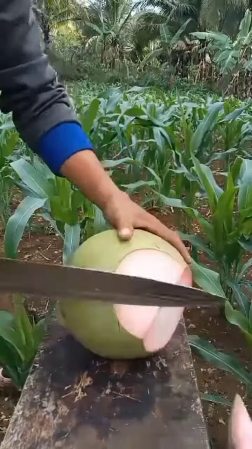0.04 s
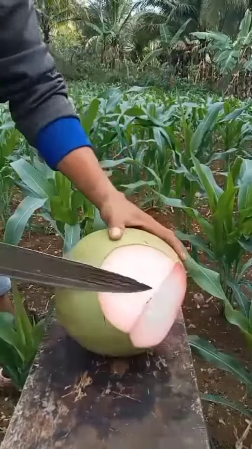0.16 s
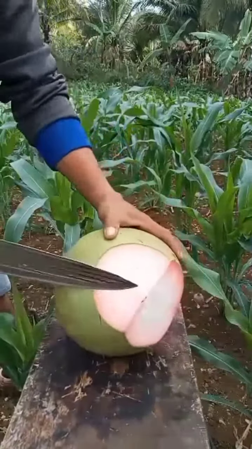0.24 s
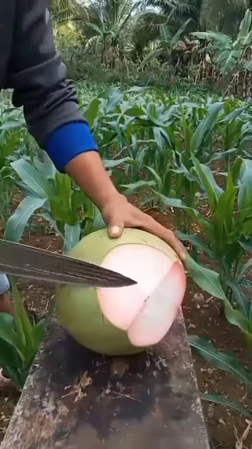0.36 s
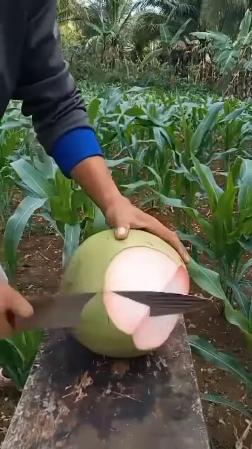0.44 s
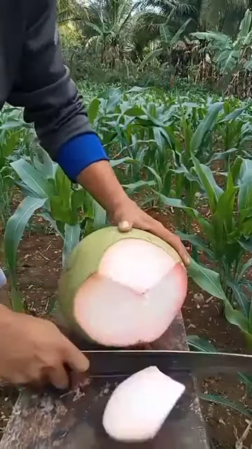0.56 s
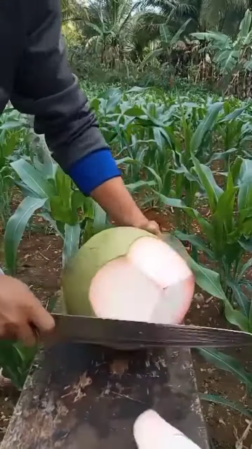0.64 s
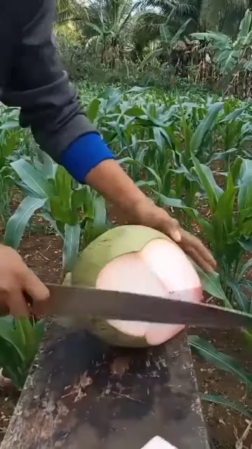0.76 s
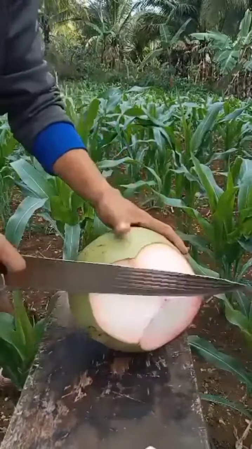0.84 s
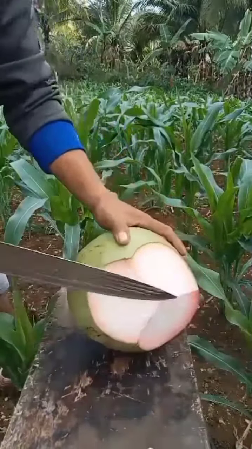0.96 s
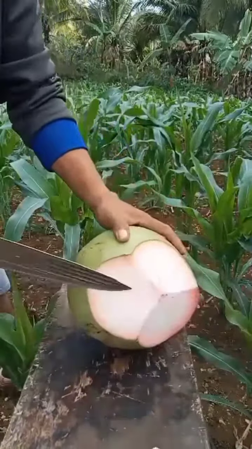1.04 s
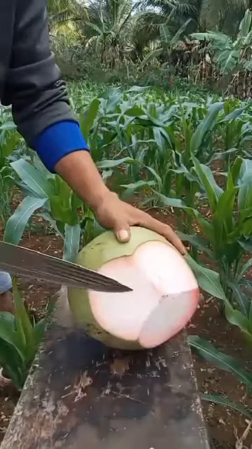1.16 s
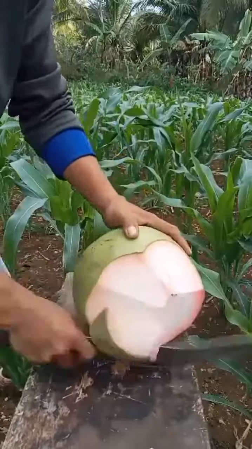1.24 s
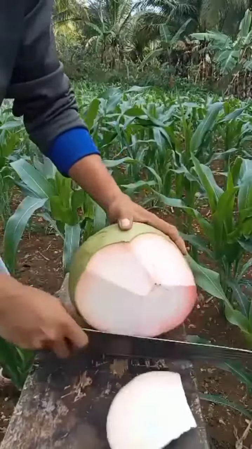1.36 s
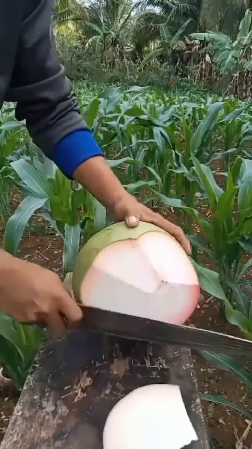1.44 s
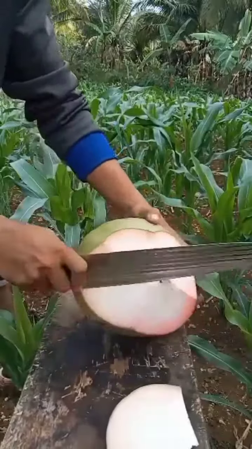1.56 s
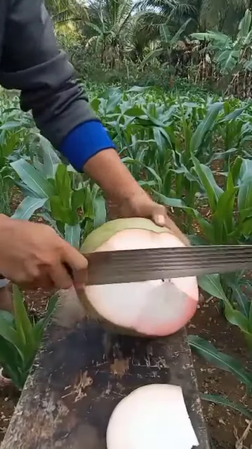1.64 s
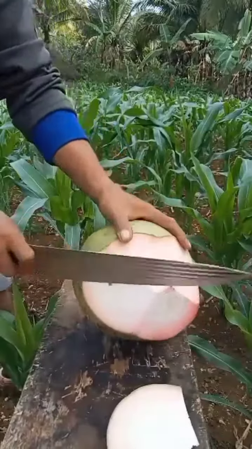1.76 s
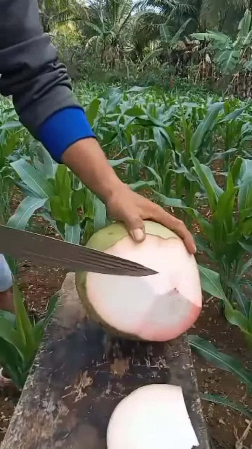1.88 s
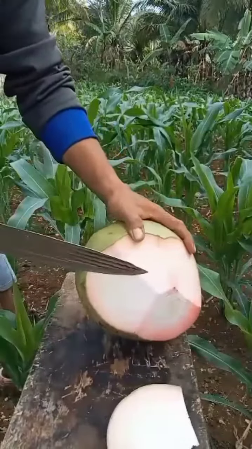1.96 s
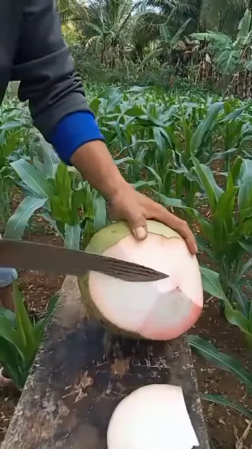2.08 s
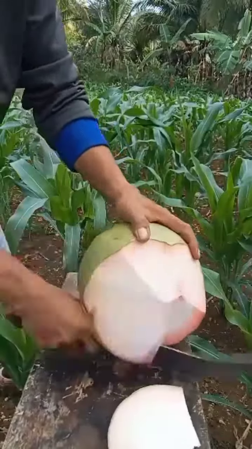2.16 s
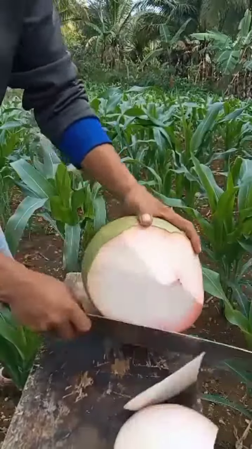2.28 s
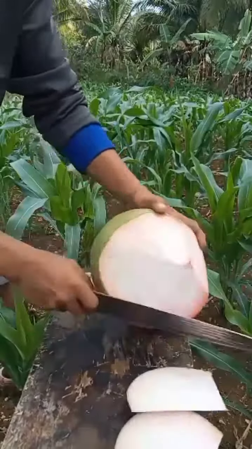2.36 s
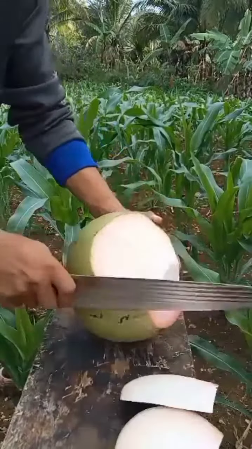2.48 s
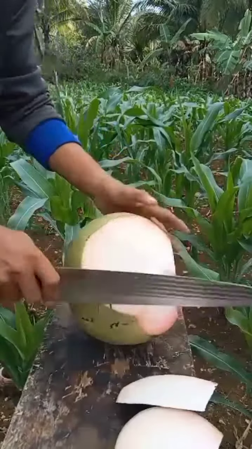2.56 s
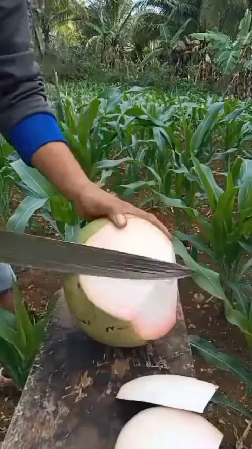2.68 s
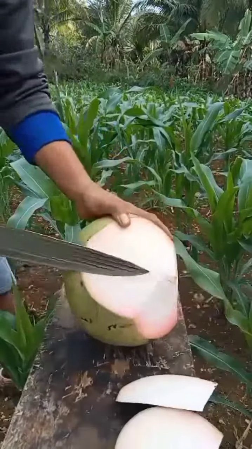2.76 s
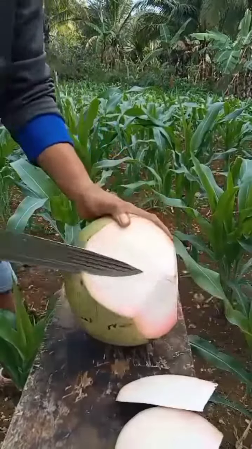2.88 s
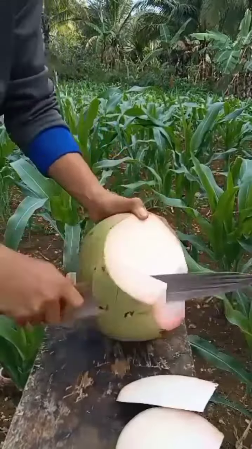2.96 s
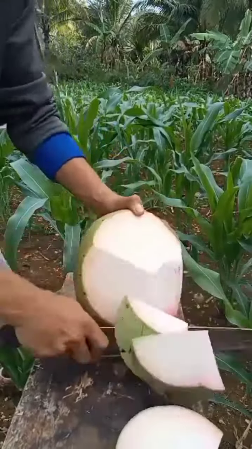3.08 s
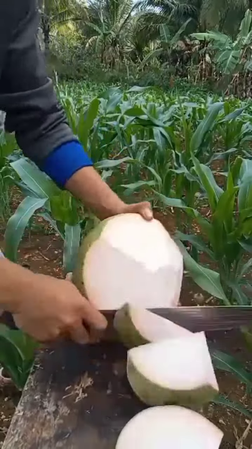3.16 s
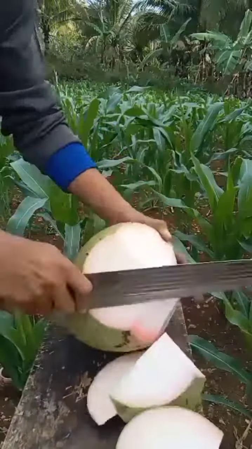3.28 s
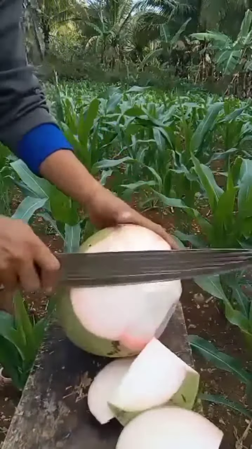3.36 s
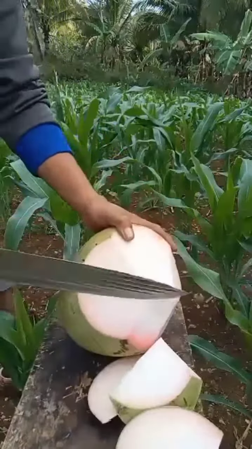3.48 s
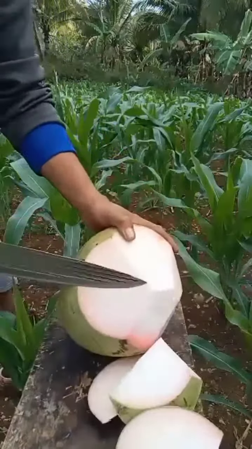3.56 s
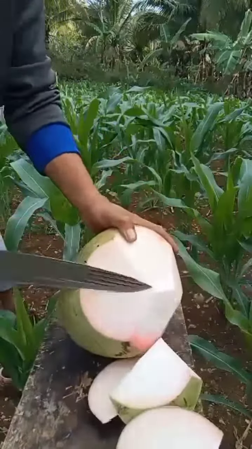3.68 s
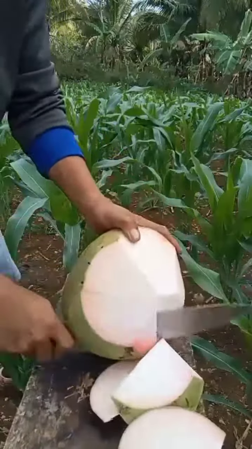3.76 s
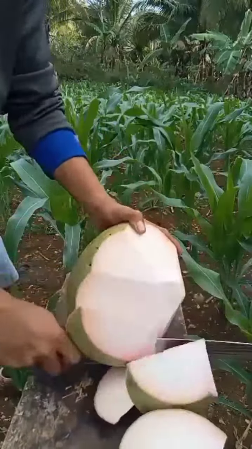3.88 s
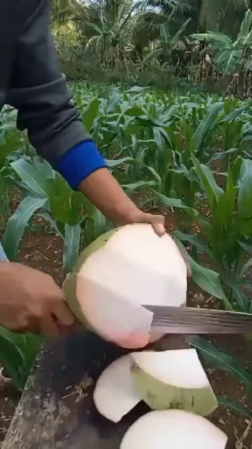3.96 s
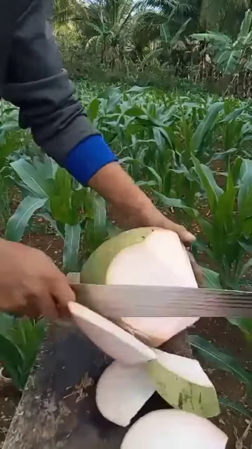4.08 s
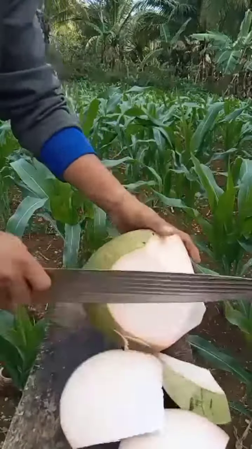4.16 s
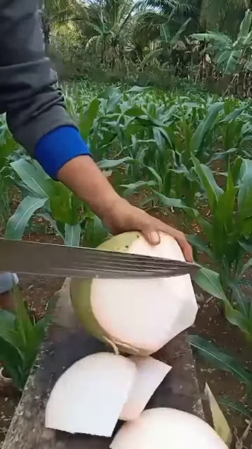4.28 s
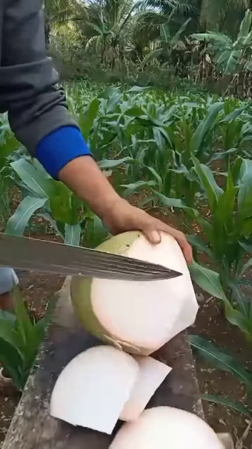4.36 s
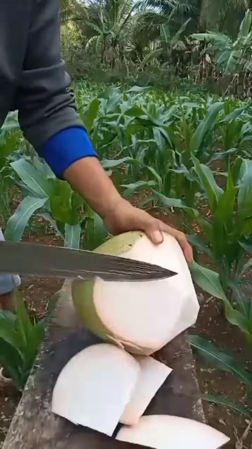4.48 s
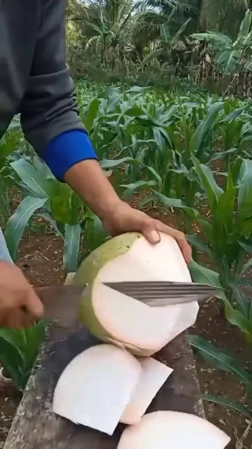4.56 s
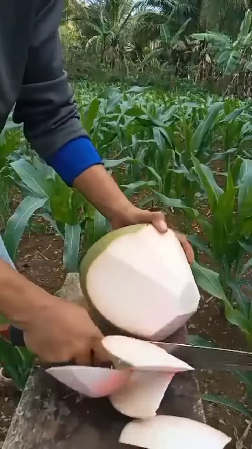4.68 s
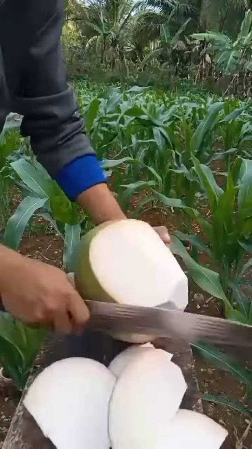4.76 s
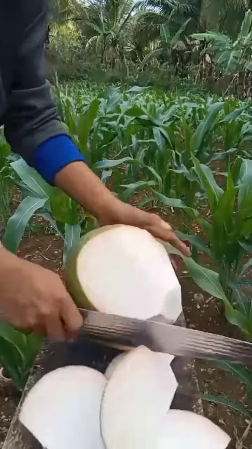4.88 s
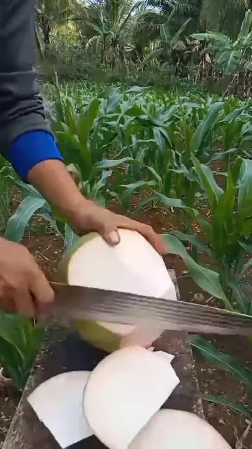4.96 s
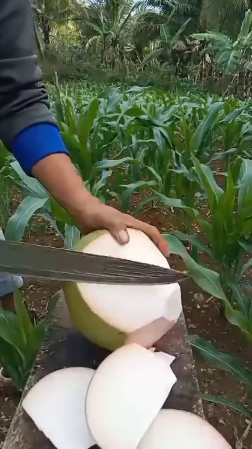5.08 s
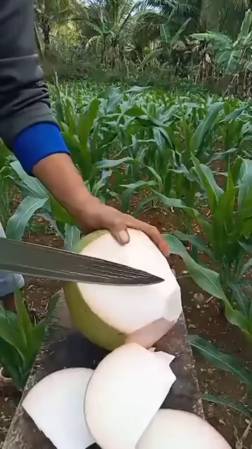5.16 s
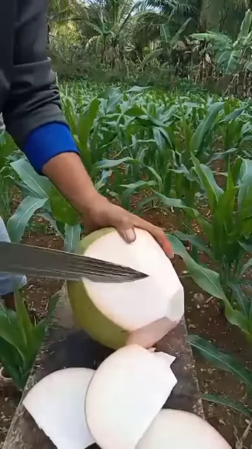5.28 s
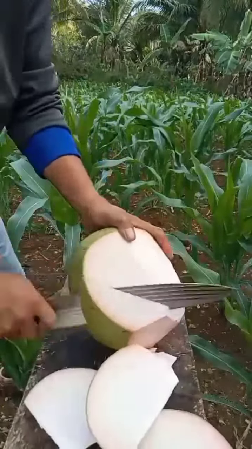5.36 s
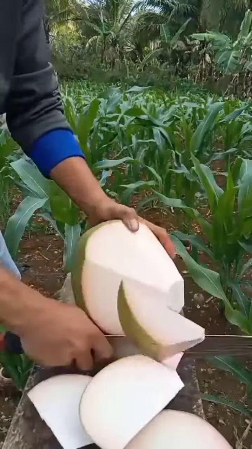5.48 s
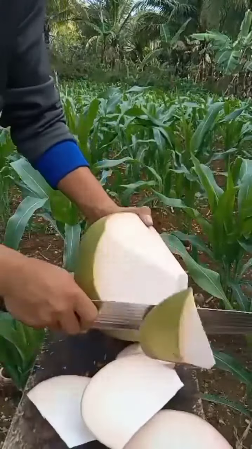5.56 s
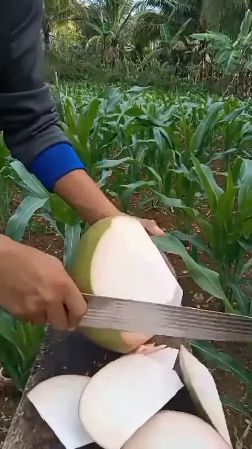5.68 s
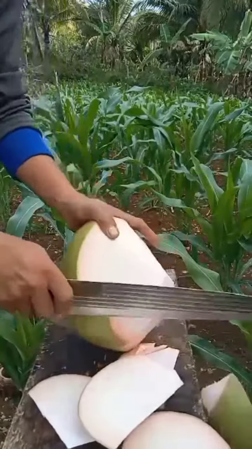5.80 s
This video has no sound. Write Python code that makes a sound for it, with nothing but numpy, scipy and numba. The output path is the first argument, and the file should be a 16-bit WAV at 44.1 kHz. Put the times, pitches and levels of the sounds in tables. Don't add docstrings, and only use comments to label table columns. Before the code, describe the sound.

Seven quick blade strokes rip through wet coconut husk, each rising rasp ending in a hard hollow knock on a wooden board outdoors.

```python
import sys
import numpy as np
from scipy import signal
from scipy.fft import rfft, irfft
from scipy.io import wavfile
from numba import njit

SR = 44100
rng = np.random.default_rng(int(sys.argv[2]) if len(sys.argv) > 2 else 0)


def field_ratio(decibels):
    return 10 ** (np.asarray(decibels, dtype=float) / 20)


def transcribe(signal):
    frames = np.atleast_2d(signal).T
    limited = np.clip(frames, -1, 1)
    pcm = np.round(limited * 32767).astype(np.int16)
    wavfile.write(sys.argv[1], SR, pcm)


N = 257103

TREBLE_EDGE_HZ, TOP_HZ = 5250, 16000
GONE_DB = -64.5

# hz, level_db (per Hz)
RASP_SPECTRUM = [(150, -61), (250, -21.5), (623, -2.5), (854, -4.5), (1230, -2.5), (1450, -7), (2200, -7),
                 (3870, -1.5), (7510, -27.5), (9960, -18.5), (13200, -30.5)]
# time_s, tearing_db, crunch_db (re tearing),
# sizzle_db (re tearing), slit_pitch_hz
FIRST_STROKES = [
    [(0.438, -53, -18, -15, 819), (0.472, -38.5, -1, -3, 870), (0.494, -38, -1, -10.5, 1010),
     (0.526, -28, -3, -3, 1050), (0.554, -23.5, -6.5, -6, 680), (0.57, -28.5, -1, -1, 673),
     (0.584, -35, 15.5, -7, 671), (0.595, -54, 10, -38.5, 670)],
    [(1.219, -55.5, 2, -8, 830), (1.245, -44.5, 1.5, -4, 1083), (1.269, -33, 0.5, -8, 1148),
     (1.305, -29.5, -10.5, -1, 1125), (1.337, -27, -3.5, -4.5, 714), (1.349, -25.5, 3.5, -1.5, 693),
     (1.371, -30.5, 3.5, -20, 665), (1.378, -38.5, 11.5, -25.5, 665)],
    [(2.105, -58, -6, -6.5, 933), (2.143, -38, -2.5, -3.5, 1013), (2.175, -33, 1, -6, 1153),
     (2.207, -28, -9, -5, 1180), (2.233, -28, -7, -6, 692), (2.245, -19, -12.5, -8.5, 653),
     (2.275, -30, 13.5, -5, 651), (2.288, -46.5, 15, -36, 661)],
    [(3.003, -61, -16, -1, 1018), (3.025, -32.5, -5.5, -4.5, 958), (3.045, -29.5, -19.5, -4, 638),
     (3.071, -26, 2.5, -0.5, 565), (3.077, -39, 9.5, 1.5, 580), (3.085, -37, 15, -8.5, 565.5),
     (3.098, -42.5, 11.5, -9, 564)],
]
LAST_STROKES = [
    [(3.733, -62.5, 0, -14.5, 1170), (3.755, -37.5, -1, -8, 1130), (3.829, -24.5, -4, -7, 1220),
     (3.851, -21.5, -1, -2.5, 1100), (3.871, -28.5, 4.5, -11, 858), (3.882, -38, -18, -11, 795)],
    [(4.54, -59, 2, -14, 859), (4.546, -44.5, -4, -14, 935), (4.576, -33.5, 0, -8, 1060),
     (4.612, -28.5, -7.5, -7.5, 1150), (4.628, -24.5, -11, -6, 1160), (4.652, -20.5, -10, -8.5, 674),
     (4.678, -25, -3, -2.5, 591), (4.698, -45, 0, 0, 577)],
    [(5.317, -49.5, -7.5, -7, 1090), (5.375, -32.5, -4, -8.5, 1040), (5.435, -28, -14.5, -1, 1120),
     (5.447, -26.5, -4, -10, 1110), (5.469, -29, -17, -3.5, 565), (5.481, -30.5, -1.5, -5, 543),
     (5.495, -20.5, -6.5, -5, 536), (5.508, -53, -6, 5, 536)],
]
STROKES = FIRST_STROKES + LAST_STROKES
# enter_s, full_tear_s, rasp_db, sizzle_db (re rasp)
NICK_ROWS = [
    (0.656, 0.684, -34, -5),
    (2.927, 2.971, -36.5, -8.5),
    (3.856, 3.921, -43, -8.5),
    (4.445, 4.473, -52, 4),
    (4.514, 4.528, -45, -6),
]


def rms_one(x):
    return x / np.sqrt(np.mean(x ** 2) + 1e-20)


def peak_one(x):
    return x / abs(x).max()


def in_time(rows, silent=None):
    s, *columns = np.transpose(rows)
    return np.array([np.interp(np.arange(N) / SR, s, c, silent, silent) for c in columns])


def colour(x, spectrum):
    hz, level_db = np.transpose(spectrum)
    grid_hz = np.maximum(np.fft.rfftfreq(8192, 1 / SR), 5)
    cepstrum = irfft(np.interp(np.log(grid_hz), np.log(hz), level_db) * np.log(10) / 20)
    cepstrum[1:4096] *= 2
    cepstrum[4097:] = 0
    return signal.fftconvolve(x, irfft(np.exp(rfft(cepstrum))))[:len(x)]


def split(x, low_hz, high_hz):
    return signal.sosfilt(signal.butter(3, [low_hz, high_hz], "band", fs=SR, output="sos"), x)


def elliptic(x, edge_hz, kind):
    return signal.sosfilt(signal.ellip(10, 0.5, 70, edge_hz, kind, fs=SR, output="sos"), x)


def drift(rate_hz):
    r = np.exp(-32 * np.pi * rate_hz / SR)
    slow = signal.lfilter([1], [1, -2 * r, r * r], rng.standard_normal(N // 16 + 3002))[3000:]
    return np.interp(np.arange(N) / 16, np.arange(len(slow)), rms_one(slow))


def add(out, s, sound):
    at = round(s * SR)
    out[at:at + len(sound)] += sound[:N - at]


def ringing(modes, scale_hz, strengths_db):
    t = np.arange(SR // 4) / SR
    out = np.zeros(len(t))
    for (multiple, level_db, t60_s), strength_db in zip(modes, strengths_db):
        envelope = field_ratio(level_db + strength_db - 60 * t / t60_s)
        out += envelope * np.sin(2 * np.pi * multiple * scale_hz * t)
    return out


@njit
def sweep(x, turn, r):
    y = np.zeros(len(x))
    for i in range(2, len(x)):
        drive = (1 - r * r) / 2 * (x[i] - x[i - 2])
        y[i] = drive + 2 * r * np.cos(turn[i]) * y[i - 1] - r * r * y[i - 2]
    return y


def resonate(x, hz, width_hz):
    turn = 2 * np.pi * (np.zeros(N) + hz) / SR
    return rms_one(sweep(x, turn, np.exp(-np.pi * width_hz / SR)))


def fibres(per_s, spread_db, cycles, clump_db, clumps_per_s):
    sizes = field_ratio(spread_db * np.minimum(rng.exponential(1, N), 4)) * rng.choice([-1, 1], N)
    sizes = sizes * (rng.random(N) < per_s / SR)
    dealt = rng.integers(0, 30, N)
    out = np.zeros(N)
    for k, hz in enumerate(np.geomspace(250, 13500, 30)):
        r, w = field_ratio(-60 * hz / (cycles * SR)), 2 * np.pi * hz / SR
        ring = signal.lfilter([1, 0, -1], [1, -2 * r * np.cos(w), r * r], sizes * (dealt == k) + 1e-18)
        out += rms_one(ring) * np.sqrt(hz) * field_ratio(clump_db * drift(clumps_per_s))
    return out


def stroke_curve(rows):
    rows = np.array(rows, float)
    last_s, _, crunch_db, sizzle_db, slit_hz = rows[-1]
    return np.vstack([rows, [last_s + 0.02, GONE_DB, crunch_db, sizzle_db - 10, slit_hz]])


def nick_curve(enter_s, full_s, full_db, sizzle_db):
    touch_db, rise_db, hold_s, release_db_per_s = -63.5, 6, 0.0082, 1103
    crunch_db, slit_hz = -2.5, 900
    stop_s = full_s + hold_s
    gone_s = stop_s + (full_db - GONE_DB) / release_db_per_s
    times_s = [enter_s, (enter_s + full_s) / 2, full_s, stop_s, gone_s]
    levels_db = [touch_db, full_db - rise_db, full_db, full_db, GONE_DB]
    return np.column_stack([times_s, levels_db, [(crunch_db, sizzle_db, slit_hz)] * len(times_s)])


def strokes():
    crunch_edge_hz = 1700
    curves = [stroke_curve(rows) for rows in STROKES] + [nick_curve(*row) for row in NICK_ROWS]
    slit = np.vstack(curves)
    slit_hz = in_time(slit[np.argsort(slit[:, 0])])[3]
    breaking = fibres(per_s=20000, spread_db=2.1, cycles=40, clump_db=1.8, clumps_per_s=30)
    tearing = colour(breaking, RASP_SPECTRUM)
    crunch = rms_one(split(tearing, 190, crunch_edge_hz))
    crunch = rms_one(crunch + 0.42 * resonate(crunch, slit_hz, width_hz=380))
    rasp = rms_one(split(tearing, crunch_edge_hz, TREBLE_EDGE_HZ))
    sizzle = rms_one(split(tearing, TREBLE_EDGE_HZ, TOP_HZ))
    out = np.zeros(N)
    for rows in curves:
        rasp_db, crunch_db, sizzle_db, _ = in_time(rows, silent=-150)
        out += field_ratio(rasp_db) * (rasp + field_ratio(crunch_db) * crunch + field_ratio(sizzle_db) * sizzle)
    return out


def rips():
    # start_s, length_s, pitch_hz, level_db
    tufts = [(0.447, 0.019, 615, -47), (0.462, 0.016, 1120, -40), (0.513, 0.017, 1040, -29),
             (0.556, 0.017, 3270, -29.5), (0.575, 0.021, 1440, -29), (0.577, 0.02, 702, -18.5),
             (1.234, 0.018, 720, -42), (1.262, 0.06, 1130, -34.5), (1.322, 0.021, 3070, -26.5),
             (1.331, 0.018, 2340, -25.5), (1.351, 0.0075, 2620, -22.5), (1.3657, 0.0048, 1324, -15),
             (2.163, 0.036, 1260, -39), (2.182, 0.024, 3030, -36), (2.212, 0.036, 3680, -26.5),
             (2.231, 0.031, 2670, -23.5), (2.272, 0.013, 1100, -31), (3.035, 0.018, 960, -32),
             (3.055, 0.015, 3370, -26.5), (3.065, 0.0074, 2740, -24.5), (3.079, .008, 1550, -28),
             (3.086, 0.0047, 2020, -31), (3.088, 0.011, 1250, -31), (3.755, 0.022, 1150, -36),
             (3.815, 0.016, 1140, -28), (3.837, 0.026, 3350, -25), (3.845, 0.026, 1700, -26.5),
             (3.863, 0.011, 2730, -25), (4.638, 0.024, 3300, -27), (5.36, 0.08, 1070, -38),
             (5.42, 0.015, 3820, -33), (5.451, 0.037, 1185, -31), (5.452, 0.029, 2200, -30),
             (5.472, 0.012, 3860, -28), (5.488, 0.0074, 3700, -26.5), (0.562, 0.029, 401, -20),
             (5.748, 0.022, 444, -40)]
    width = 0.12
    out = np.zeros(N)
    for s, length_s, hz, level_db in tufts:
        size = int(min(length_s, 0.07) * SR)
        tuft = split(rng.standard_normal(SR // 12), (1 - width) * hz, (1 + width) * hz)[-size:]
        add(out, s, field_ratio(level_db) * rms_one(tuft) * signal.windows.tukey(size, 0.7))
    return out


def knocks():
    # start_s, peak_db, nut_pitch_hz, crack_db (re peak), crushing_s
    chops = [(0.568, -20.5, 467, -7, 0.004), (0.577, -22, 460, -6.5, 0.0085),
             (0.584, -23, 670, -18.5, 0.0051), (1.348, -16, 350, -16.5, 0.0069),
             (1.359, -20.5, 334, -19.5, 0.0091), (1.364, -20, 453, 6.5, 0.0031),
             (1.369, -15, 417, -21, 0.003), (2.254, -14.5, 520, -9, 0.0084), (2.272, -14, 440, -13, 0.0061),
             (2.282, -24.5, 624, -20, 0.0052), (3.087, -15.5, 405, -14, 0.0045),
             (3.092, -17, 606, -16, 0.0039), (3.867, -16.5, 430, -10, 0.0023), (4.667, -18, 520, -21, 0.01),
             (4.69, -18, 397, -28, 0.0076), (5.493, -15.5, 472, -12, 0.0066), (5.498, -29, 296, -42, 0.006)]
    # start_s, peak_db, nut_pitch_hz, crack_db (re peak)
    taps = [(0.073, -40, 608, -4.5), (0.336, -32.5, 338, -13), (0.347, -38.5, 695, -2.5),
            (0.688, -20.5, 410, -6), (0.951, -40.5, 293, -30), (1.443, -28, 283, -15),
            (1.472, -36, 554, -4.5), (1.79, -38, 696, -8.5), (1.86, -46, 392, 1),
            (2.419, -25.5, 303, -16.5), (2.479, -27, 264, -19), (2.68, -43, 727, -9.5),
            (2.738, -42, 395, -5), (3.195, -36.5, 372, -34), (3.335, -31.5, 425, -10.5),
            (3.416, -49, 357, -29), (3.526, -40.5, 452, -7), (4.205, -37.5, 544, -12),
            (4.53, -23.5, 430, -14), (4.792, -27, 420, -10), (4.828, -32.5, 608, -15),
            (5.744, -42.5, 380, -10), (5.768, -25.5, 385, -22.5)]
    # multiple_of_pitch, level_db, t60_s
    nut_modes = [(1.0, 8.5, 0.041), (1.5, 2.5, 0.016), (2.4, -24.5, 0.011), (.78, -16.5, 0.082)]
    # hz, level_db (per Hz)
    crack_spectrum = [(150, -43.5), (400, -4.5), (900, 5.5), (1800, -2.5), (3000, -6.5), (4500, -12.5),
                      (7500, -28.5), (10000, -26), (13200, -37)]
    tap_crush_s = 0.0044
    out, t = np.zeros(N), np.arange(SR // 12) / SR
    for s, peak_db, nut_hz, crack_db, crush_s in chops + [(*row, tap_crush_s) for row in taps]:
        crushing = rng.standard_normal(len(t)) * (t / crush_s) * np.exp(1 - 1.28 * t / crush_s)
        width_s = 0.000083 * field_ratio(-0.16 * peak_db)
        push = np.exp(-((t - 0.0022) / width_s) ** 2) * 0.00031 / width_s
        contact = push + 0.53 * crushing * np.sqrt(crush_s / 0.0018)
        strengths_db = np.clip(3.1 * rng.standard_normal(4), -4, 4)
        hollow = signal.fftconvolve(contact, ringing(nut_modes, nut_hz, strengths_db))
        crack = colour(crushing, crack_spectrum) + 1.1 * np.gradient(push)
        add(out, s, field_ratio(peak_db + 4) * peak_one(hollow))
        add(out, s, field_ratio(peak_db + crack_db + 9) * crack)
    return out


def landings():
    # centre_s, peak_db, pop_pitch_hz, first_bounce_loss_db
    pops = [
        (0.5784, -14.5, 610, 1.5),
        (4.6787, -10.5, 550, 14),
        (1.3673, 0.5, 623, 2.5),
        (2.2748, -4, 536, 13),
        (3.0866, -1.5, 507, 2),
        (5.4962, -5, 478, -0.5),
    ]
    bounce_s, dulling, later_loss_db, pop_cycles = 0.00414, 0.81, 13, 0.54
    out, t = np.zeros(N), np.arange(-200, 200) / SR
    for s, peak_db, hz, first_loss_db in pops:
        for k in range(4):
            bounced = min(k, 1)
            turns = t * hz * dulling ** bounced
            pop = np.cos(2 * np.pi * turns + 0.66) * np.exp(-(turns / pop_cycles) ** 2)
            level_db = peak_db - first_loss_db * bounced - later_loss_db * max(k - 1, 0)
            add(out, s + t[0] + k * bounce_s, field_ratio(level_db) * pop)
    return out


def board():
    # start_s, peak_db, pitch_hz, t60_s
    blows = [(0.238, -34.5, 135, 0.029), (0.335, -32.5, 131, 0.074), (0.586, -25, 214, 0.11),
             (0.687, -34.5, 198, 0.31), (0.937, -43.5, 180, 0.059), (1.362, -20.5, 222, 0.11),
             (1.443, -33.5, 187, 0.09), (1.491, -31, 219, 0.12), (2.277, -21.5, 204.6, 0.12),
             (2.418, -28, 179, 0.065), (2.479, -32.5, 251, 0.065), (3.089, -16.5, 175, 0.066),
             (3.193, -37.5, 194, 0.28), (3.338, -39.5, 210, 0.1), (3.859, -24.5, 169, 0.056),
             (4.208, -31.5, 141, 0.017), (4.487, -30, 230, 0.04), (4.525, -24, 165, 0.11),
             (4.67, -23, 221, 0.078), (4.688, -18, 202, 0.093), (4.79, -35, 216, 0.073),
             (4.828, -32, 154.5, 0.077), (5.498, -17, 207.5, 0.12), (5.766, -26.5, 212, 0.054)]
    out, t = np.zeros(N), np.arange(SR // 4) / SR
    for s, peak_db, hz, t60_s in blows:
        low_db, high_db = [-7.5, -10] + np.array([3.9, 1.1]) * rng.standard_normal(2)
        wave = np.sin(2 * np.pi * hz * t)
        wave += field_ratio(low_db) * np.sin(2 * np.pi * 0.696 * hz * t)
        wave += field_ratio(high_db - 40 * t / t60_s) * np.sin(2 * np.pi * 1.42 * hz * t)
        envelope = (1 - np.exp(-t / 0.0091)) * field_ratio(-60 * (t / t60_s) ** 0.74)
        add(out, s, field_ratio(peak_db + 2.5) * peak_one(wave * envelope))
    return out


def snaps():
    # start_s, peak_db, pitch_hz, treble_db (re peak)
    snap_rows = [(0.333, -37, 1960, -15), (0.69, -12.5, 1500, -8), (0.8223, -45.5, 1560, -23),
                 (0.905, -42.5, 1550, -16), (1.466, -41, 1510, -15), (1.681, -48, 4080, -11),
                 (3.176, -36, 1120, -14.5), (3.246, -35.5, 1790, -14), (3.526, -37.5, 990, -18),
                 (3.91, -19.5, 3100, -16.5), (3.9189, -14.5, 3030, -15), (4.15, -46, 3180, -24),
                 (4.208, -33.5, 2360, -17), (4.425, -38, 3230, -42), (4.533, -26, 1590, -19),
                 (4.5544, -24, 1673, -15), (5.475, -32.5, 3370, 8), (5.683, -44, 1240, -16)]
    # start_s, peak_db, pitch_hz, treble_db (re peak)
    scuff_rows = [(0.228, -46.5, 2480, -2), (1.56, -38.5, 2680, -11), (1.859, -49, 1150, -0.5),
                  (1.947, -50.5, 3030, -7.5), (2.466, -42.5, 1780, -6.5), (2.515, -56, 4000, 2),
                  (2.739, -42.5, 4210, -5), (3.358, -47, 1650, -19), (3.997, -40, 1052, -14.5),
                  (4.361, -43.5, 1240, -5), (4.567, -33.5, 1260, -3), (4.773, -34.5, 1320, -11),
                  (5.129, -42, 3770, -12), (5.4183, -21.5, 1120, -38), (5.5667, -43.5, 2860, -5)]
    scuff_s = 0.022
    bursts = [(*row, 0.0056 * field_ratio(-0.51 * (row[1] + 29))) for row in snap_rows]
    bursts += [(*row, scuff_s) for row in scuff_rows]
    out, t = np.zeros(N), np.arange(SR // 10) / SR
    for s, peak_db, hz, treble_db, length_s in bursts:
        burst = rng.standard_normal(len(t)) * (t / length_s) ** 0.6 * np.exp(-2.2 * t / length_s)
        body = split(burst, 400, TREBLE_EDGE_HZ) + 1.6 * split(burst, 0.8 * hz, 1.2 * hz)
        spit = split(colour(burst, RASP_SPECTRUM), TREBLE_EDGE_HZ, TOP_HZ)
        add(out, s, field_ratio(peak_db + 0.5) * (peak_one(body) + field_ratio(treble_db + 8) * peak_one(spit)))
    return out


def singing():
    # start_s, level_db
    lifts = [
        (0.988, -51),
        (1.863, -61),
        (3.53, -54.5),
        (4.2, -58),
    ]
    # hz, level_db, t60_s
    blade_modes = [(4700, -6, .1), (9000, -3, .1), (10100, -3, .1), (11100, -2, .1), (12000, 0, .1)]
    out = np.zeros(N)
    for s, level_db in lifts:
        rubbing = rng.standard_normal(2000) * np.hanning(2000)
        steel = ringing(blade_modes, 1, 3 * rng.standard_normal(len(blade_modes)))
        add(out, s, field_ratio(level_db) * peak_one(signal.fftconvolve(rubbing, steel)))
    return out


def swishes():
    # start_s, length_s, pitch_hz, level_db
    passes = [(0.205, 0.051, 3180, -50), (0.401, 0.041, 2800, -52), (0.661, 0.051, 3040, -47),
              (1.51, 0.052, 3160, -58), (1.547, 0.084, 2680, -55.5), (1.574, 0.07, 1180, -53.5),
              (1.603, 0.13, 3560, -73), (2.318, 0.058, 2800, -55.5), (2.407, 0.012, 3900, -55),
              (1.025, 0.1, 900, -60), (4.451, 0.035, 3200, -48), (4.23, 0.12, 2340, -59),
              (5.686, 0.075, 2520, -57)]
    out = np.zeros(N)
    for s, length_s, hz, level_db in passes:
        noise = rng.standard_normal(SR // 6)
        rub = split(noise, 0.876 * hz, 1.1 * hz) + 0.5 * split(noise, 1.3 * hz, 1.45 * hz)
        rub += 0.66 * split(noise, 260, 4330)
        size = int(length_s * SR)
        add(out, s, field_ratio(level_db) * rms_one(rub)[:size] * signal.windows.tukey(size, 0.6))
    return out


def effort():
    # time_s, level_db
    brushing_curve = [(0, -57), (0.1, -84.5), (0.5, -47), (0.78, -73.5), (1.01, -55), (1.6, -58),
                      (1.77, -91), (1.93, -58.5), (2.09, -86), (2.29, -52.5), (2.68, -78.5), (3.26, -54),
                      (3.38, -65), (3.9, -58.5), (4.3, -54), (4.9, -69.5), (5.33, -44.5), (5.65, -64.5)]
    # centre_s, length_s, rocking_db, rolling_db
    shoves = [(0.053, 0.3, -35.5, -53.5), (0.268, 0.17, -41, -53), (0.62, 0.28, -35, -40),
              (0.813, 0.52, -41.5, -55), (1.028, 1, -53, -60.5), (1.367, 0.34, -41.5, -47),
              (1.46, 0.3, -40, -44), (2.302, 0.2, -32, -36), (2.433, 0.17, -38, -61.5),
              (2.696, 0.17, -37, -56), (2.889, 0.45, -39, -70), (3.11, 0.17, -35.5, -36.5),
              (3.354, 0.25, -37, -61), (3.878, 0.11, -46.5, -34), (4.06, 0.34, -37.5, -62.5),
              (4.255, 0.19, -45, -46.5), (4.398, 0.2, -44, -51), (5.313, 0.9, -62.5, -54.5),
              (4.531, 0.16, -51, -36.5), (4.807, 0.098, -30, -32.5), (5.513, 0.14, -45.5, -43),
              (5.82, 0.17, -49, -45)]
    lift_db, lift_s, muffle_db, muffle_s, shove_fall_db = -6.5, 0.028, -3.5, 0.051, 15.5
    t = np.arange(N) / SR
    ends_s = [rows[-2][0] for rows in STROKES]
    muffled = np.max([(t > s) * np.exp(-abs(t - s) / muffle_s) for s in ends_s], axis=0)
    entries_s = [rows[0][0] for rows in STROKES] + [row[0] for row in NICK_ROWS]
    lifted = np.max([np.exp(-((t - s) / lift_s) ** 2) for s in entries_s], axis=0)
    brush_db = in_time(brushing_curve)[0] + lift_db * lifted
    treble_db = brush_db - 13 + muffle_db * muffled
    rocking_db, rolling_db = np.full(N, -79.0), np.full(N, -69.0)
    for s, length_s, rock_db, roll_db in shoves:
        fall_db = shove_fall_db * abs(t - s) / (length_s / 2)
        rocking_db = np.maximum(rocking_db, rock_db - fall_db)
        rolling_db = np.maximum(rolling_db, roll_db - fall_db)
    return brush_db, treble_db, rocking_db, rolling_db


def handling():
    # hz, level_db (per Hz)
    brush_spectrum = [(240, -27.5), (400, -2.5), (948, 1), (1430, -2.5), (3340, -5), (4410, -6),
                      (6450, -19.5), (7910, -27), (9850, -15), (13200, -28.5)]
    # hz, level_db (per Hz)
    rumble_spectrum = [(12, -40), (20, -6.5), (38, -4), (64, -11), (150, -5), (260, -25), (340, -44.5),
                       (570, -120)]
    # hz, level_db
    rocking_modes = [(48, 0.5), (62, 10.5), (80, 0.5), (100, -18.5)]
    brush_db, treble_db, rocking_db, rolling_db = effort()
    breaking = fibres(per_s=24000, spread_db=2, cycles=34, clump_db=4.5, clumps_per_s=10)
    brush = colour(breaking, brush_spectrum)
    brushing = field_ratio(brush_db) * rms_one(split(brush, 300, TREBLE_EDGE_HZ))
    brushing += field_ratio(treble_db) * rms_one(split(brush, TREBLE_EDGE_HZ, TOP_HZ))
    shaking = rms_one(colour(rng.standard_normal(N), rumble_spectrum))
    rocking = 1.2 * shaking
    for hz, level_db in rocking_modes:
        rocking += field_ratio(level_db + 6 * drift(3)) * resonate(shaking, hz, width_hz=8)
    rolling = rms_one(split(rng.standard_normal(N), 84, 600) * field_ratio(2.9 * drift(28)))
    rolling = rms_one(rolling + 1.4 * resonate(rolling, 205, width_hz=62))
    return brushing + field_ratio(rocking_db - 5.5) * rms_one(rocking) + field_ratio(rolling_db) * rolling


def sways():
    # start_s, length_s, from_hz, to_hz, peak_db
    groans = [(.03, 0.12, 80, 45, -40), (0.21, 0.095, 79.6, 55, -42), (0.569, 0.069, 52.3, 65, -43),
              (0.74, 0.11, 58.6, 83, -39.5), (0.83, 0.26, 38, 53.3, -45.5),
              (0.996, 0.13, 58.3, 48.3, -43.5), (1.2, 0.16, 211, 71, -46), (1.327, 0.045, 55, 50.2, -36.5),
              (1.447, 0.11, 72, 89, -42.5), (2.168, 0.1, 50, 70, -44), (2.229, 0.044, 48, 55, -43),
              (2.343, 0.069, 48, 70, -42), (2.427, 0.075, 52.5, 49.7, -39), (2.653, 0.1, 100, 62, -44),
              (2.851, 0.077, 94, 45, -51.5), (3.072, 0.12, 52, 60, -40.5), (3.357, 0.077, 67.5, 70, -48.5),
              (3.864, 0.08, 74.6, 50.3, -37), (4.033, 0.1, 75, 50.3, -39), (4.369, 0.13, 58, 68, -46),
              (4.558, 0.11, 60, 62, -45), (5.488, 0.12, 54.7, 60, -49), (5.78, 0.093, 65, 62, -40.5)]
    # start_s, length_s, from_hz, to_hz, peak_db
    whines = [
        (1.59, 0.14, 3760, 3750, -62),
    ]
    out = np.zeros(N)
    for s, length_s, from_hz, to_hz, peak_db in groans + whines:
        size = int(length_s * SR)
        turns = np.cumsum(np.geomspace(from_hz, to_hz, size)) / SR
        add(out, s, field_ratio(peak_db - 1.5) * np.sin(2 * np.pi * turns) * signal.windows.tukey(size, 0.7))
    return out


def field():
    # hz, level_db (per Hz)
    leaf_spectrum = [(18, -34.5), (30, -4), (92, 5.5), (446, -16.5), (706, -11), (2060, -23), (3790, -17.5),
                     (7930, -39), (9970, -24.5), (13200, -45.5)]
    leaves = rms_one(colour(rng.standard_normal(N), leaf_spectrum))
    gusts, edges_hz = drift(13), np.geomspace(1200, TOP_HZ, 9)
    rustle = np.zeros(N)
    for k, (low_hz, high_hz) in enumerate(zip(edges_hz, edges_hz[1:])):
        patch_db = 5 * np.roll(gusts, k * N // len(edges_hz)) + 3 * gusts - 4
        rustle += (field_ratio(patch_db) - 1) * split(leaves, low_hz, high_hz)
    return field_ratio(-58) * (leaves + rustle)


def scene():
    # hz, level_db
    dip_response = [(1700, -0.5), (2600, 0), (4300, -2.5), (5000, -5.5), (6500, -3), (8000, 0)]
    near = strokes() + rips() + knocks() + board() + snaps() + singing() + swishes()
    near = signal.sosfilt(signal.butter(2, 120, "high", fs=SR, output="sos"), near)
    echo = np.roll(split(near, 320, 3000), round(0.012 * SR))
    around = handling() + sways() + field()
    sound = colour(near + field_ratio(-18) * echo + landings() + around, dip_response)
    return np.array([sound, sound])


def roll_off(x):
    return signal.sosfilt(signal.butter(12, 14190, fs=SR, output="sos"), x)


def record(dry):
    wide_from_hz, wide_db, cutoff_hz = 4250, -3.6, 13150
    scrambled = dry[0] * drift(250)
    side = field_ratio(wide_db) * elliptic(scrambled, wide_from_hz, "high")
    wide = np.clip(dry, -0.94, 0.94) + side * [[1], [-1]]
    return roll_off(elliptic(wide, cutoff_hz, "low"))


dry = scene()
out = record(dry)
transcribe(out)
```